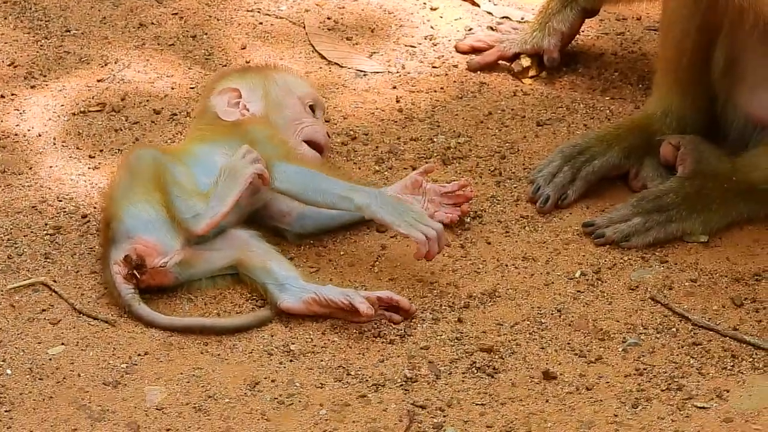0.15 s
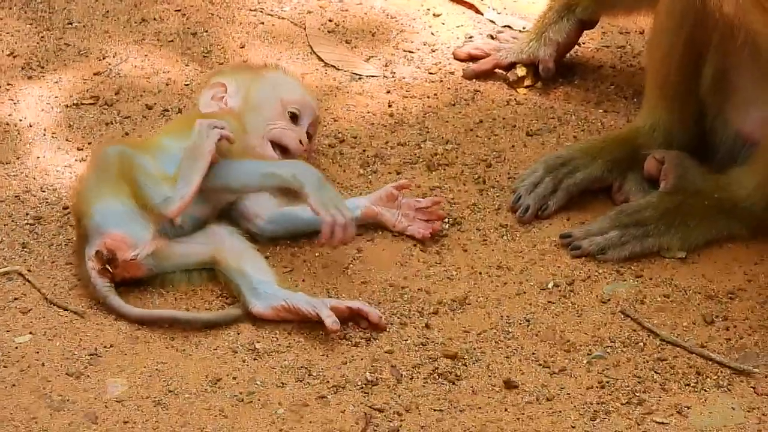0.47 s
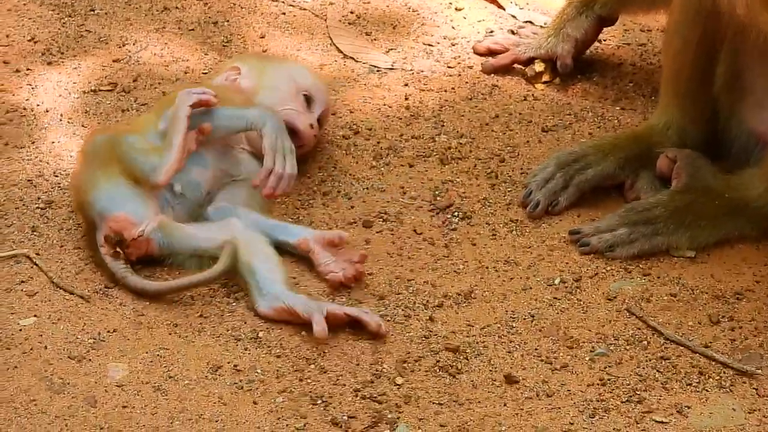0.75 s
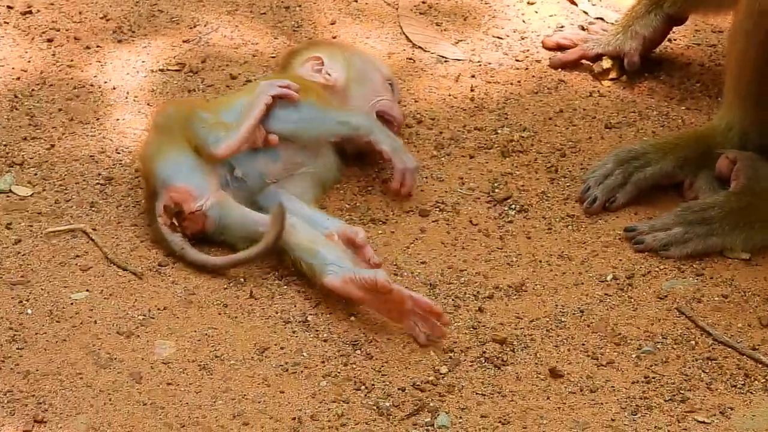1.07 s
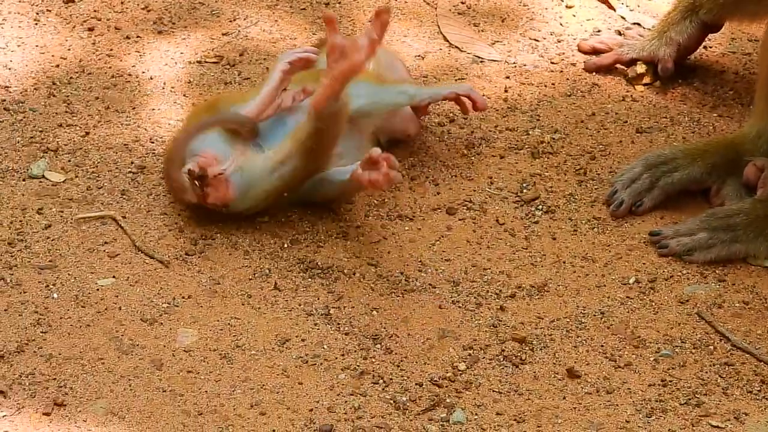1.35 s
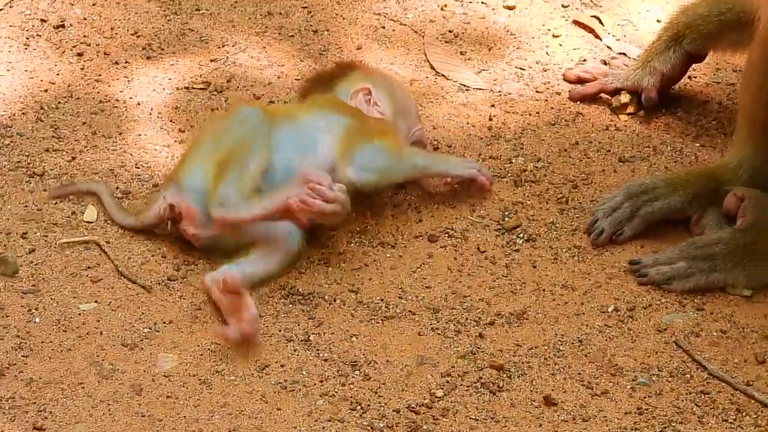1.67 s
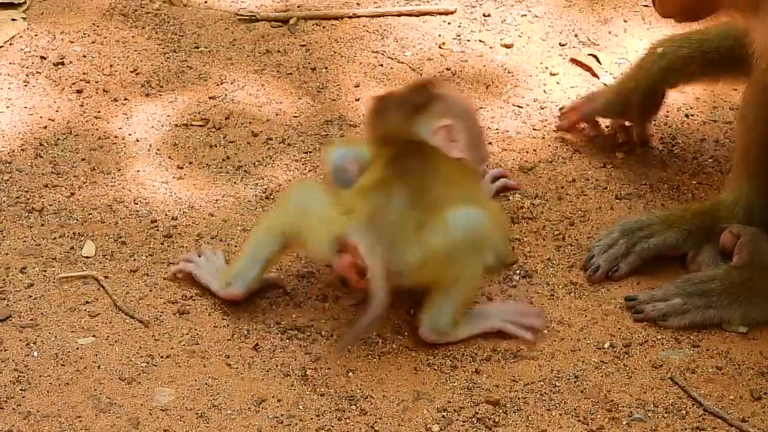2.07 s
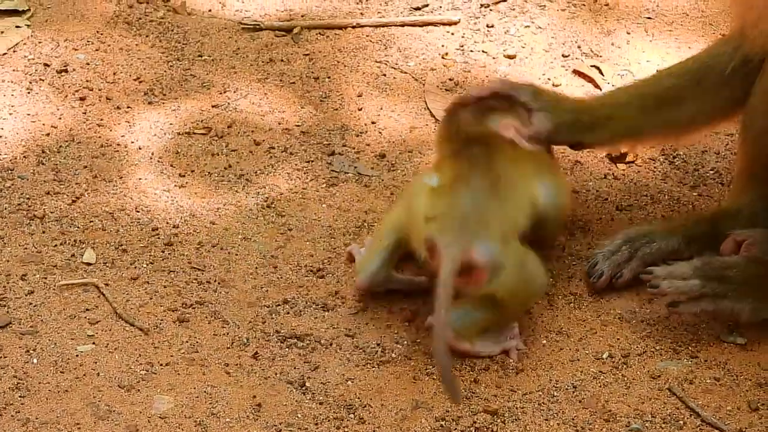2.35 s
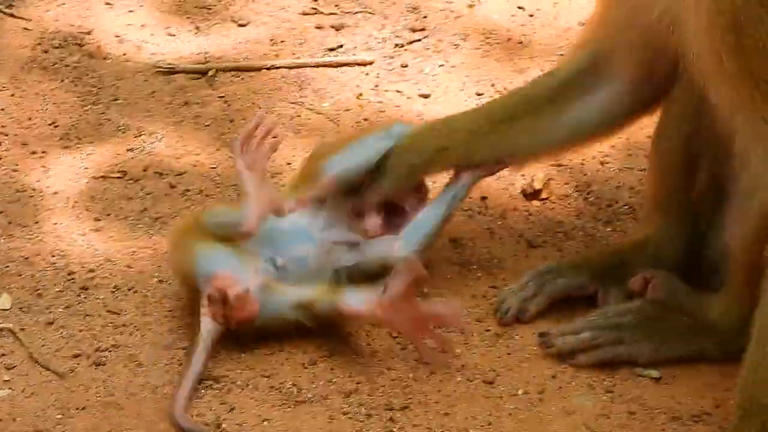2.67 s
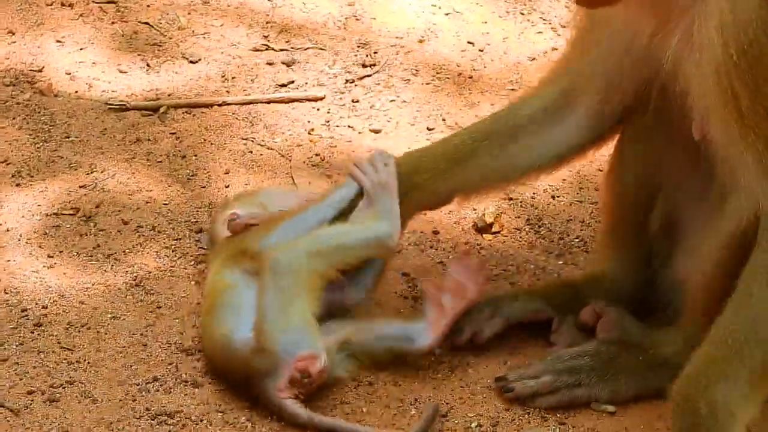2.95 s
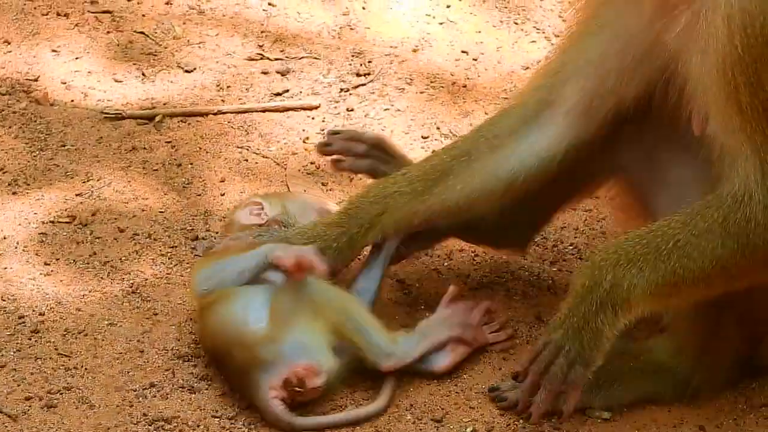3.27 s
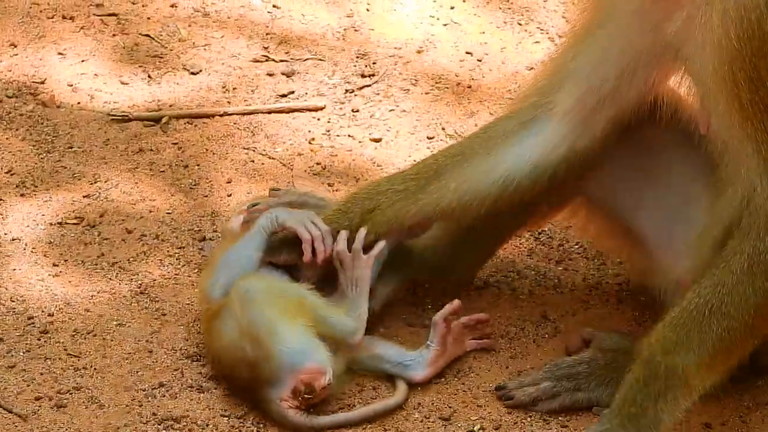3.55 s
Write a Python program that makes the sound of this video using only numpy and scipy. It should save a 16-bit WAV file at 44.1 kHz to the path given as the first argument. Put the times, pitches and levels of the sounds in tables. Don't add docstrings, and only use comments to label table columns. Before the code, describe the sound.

An infant monkey screams, with hoarse barks, rasping screeches and thin wavering whistles over forest soil

```python
import sys
import numpy as np
from scipy import signal
from scipy.fft import rfft, irfft, next_fast_len
from scipy.io import wavfile
from scipy.ndimage import uniform_filter1d, map_coordinates

SR = 44100
rng = np.random.default_rng(int(sys.argv[2]) if len(sys.argv) > 2 else 0)


def unload_audio(sound):
    columns = np.transpose(np.atleast_2d(sound))
    steps = np.round(np.clip(columns, -1, 1) * 32767)
    wavfile.write(sys.argv[1], SR, steps.astype(np.int16))


def to_linear_factor(level_db):
    exponent = np.asarray(level_db, float) / 20
    return 10 ** exponent


N = 163170

# centre in Hz, width in Hz, level in dB.
CHEST_MODES = [(572, 336, -2), (1320, 790, 3.2), (1743, 690, -0.5)]
FOLD_JITTER = 0.035
EDGE_S = 0.0021
BRIGHT_HZ, TOP_HZ = 5500, 12400


def unit(x):
    return x / np.sqrt(np.mean(x ** 2) + 1e-20)


def along(points, hz):
    f, v = np.transpose(points)
    return np.interp(np.log(hz + 1), np.log(f + 1), v)


def wobble(rate, size=N):
    knots = rng.standard_normal(int(size * rate / SR) + 4)
    return map_coordinates(knots, [np.arange(size) * rate / SR])


def filtered(x, response):
    m = next_fast_len(x.shape[-1] + 4096)
    spectrum = rfft(x, m) * response(np.fft.rfftfreq(m, 1 / SR))
    return irfft(spectrum, m)[..., :x.shape[-1]]


def call(rows):
    s, *cols = np.transpose(rows)
    start = round(s[0] * SR)
    t = np.arange(start, round(s[-1] * SR)) / SR
    gate = np.clip(np.minimum(t - s[0], s[-1] - t) / EDGE_S, 0, 1)
    return start, gate, [np.interp(t, s, c) for c in cols]


def folds(hz, noise_share, size):
    arch_depth, shimmer_db = 0.27, 1.5
    along_call = np.linspace(-1, 1, size)
    arch = 1 - arch_depth * along_call ** 2
    jitter = FOLD_JITTER * (wobble(25, size) + wobble(500, size))
    cycles = np.cumsum(hz * (arch + jitter)) / SR
    swing = np.cos(2 * np.pi * cycles)
    shut = np.exp(40 * (swing - 1))
    pulses = unit(np.diff(shut, prepend=0) * to_linear_factor(shimmer_db * wobble(608.5, size)))
    puff_gain = (1.3 + swing) * to_linear_factor(2.5 * np.tanh(wobble(250, size)))
    puffs = unit(rng.standard_normal(size) * puff_gain)
    share = noise_share + .25 - .5 * np.exp(-6 * along_call ** 2) + .15 * wobble(30, size)
    share = np.clip(share, .2, 1)
    return cycles, np.sqrt(1 - share) * pulses + np.sqrt(share) * puffs, 1 - share


def resonant(x, modes, tilt_db=0):
    def response(f):
        one = 0
        for k, (centre_hz, width_hz, db) in enumerate(modes):
            loss = 1j * f * width_hz
            one = one + (-1) ** k * to_linear_factor(db / 2) * loss / (centre_hz ** 2 - f ** 2 + loss)
        tilt = to_linear_factor(tilt_db * np.tanh(2 * np.log((f + 1) / BRIGHT_HZ)))
        return one ** 2 / (1 + (f / TOP_HZ) ** 4) * tilt
    return unit(filtered(x, response))


def around(source, hz, width_hz):
    slow = filtered(source, lambda f: 1 / (1 + (f / width_hz) ** 4))
    return unit(slow * np.sin(2 * np.pi * np.cumsum(hz) / SR))


def blotchy(x):
    z = signal.stft(x, nperseg=256)[2]
    field = uniform_filter1d(uniform_filter1d(rng.standard_normal(z.shape), 4, 0), 5, 1)
    patch_db = 3 * unit(field)
    return unit(signal.istft(z * to_linear_factor(patch_db), nperseg=256)[1][:len(x)])


def rasp(source, db, bright_db):
    # centre in Hz, width in Hz, level in dB.
    throat = [(2460, 2230, -5.5), (4730, 540, 3.6), (5665, 1080, 3.5), (7000, 2350, 7), (9780, 5200, -4.5)]
    shrill_growth = 0.09
    voice = blotchy(resonant(source, throat, bright_db))
    upper = filtered(voice, lambda f: 1 / (1 + (BRIGHT_HZ / (f + 1)) ** 6))
    return voice + upper * (to_linear_factor(shrill_growth * (db - db.max())) - 1)


def screeches():
    # time in s, whistle in Hz, level in dB, whistle over rasp in dB.
    paths = [
        [(.924, 3530, -26, 14), (.93, 3926, -21.5, 1.5), (.965, 4005, -18, -1), (1.005, 4344, -25, -2),
         (1.015, 4305, -22.5, -18), (1.06, 4214, -25, 4.5), (1.075, 4950, -26, 11), (1.095, 4420, -35, 20)],
        [(1.22, 2880, -17.5, -2), (1.228, 3700, -26, 6), (1.26, 4076, -20, 5.5), (1.292, 4805, -13.5, 17.5),
         (1.305, 4706, -20, 2.5), (1.34, 4020, -27, -10), (1.378, 4650, -33.5, -1)],
        [(1.546, 3770, -22, 12), (1.556, 3674, -26.5, 0), (1.562, 4130, -19, 2), (1.62, 4790, -19.5, -0.5),
         (1.64, 4300, -20, -14), (1.705, 4850, -27, -8), (1.745, 4860, -20.5, -1.5), (1.78, 5580, -33.5, -5)],
        [(2.205, 4630, -27.5, 3), (2.235, 4890, -22, 4.5), (2.285, 4710, -22, 11), (2.32, 3670, -42, -17)],
        [(2.436, 2900, -29, 13.5), (2.468, 3467, -24.5, -0.5), (2.49, 4240, -25, -4), (2.533, 5080, -21.5, 3.5),
         (2.545, 4480, -16.5, -3), (2.59, 4110, -22.5, -0.5), (2.612, 5480, -16.5, 7.5),
         (2.65, 5030, -17.5, 12), (2.685, 4610, -39, 0)],
    ]
    # fold rate in Hz, noise share 0-1, torn band in dB, chest in dB,
    # brightness in dB.
    voices = [(820, 0.56, -8, -24, 7.5), (757, 0.86, 1.5, -23, 2), (956, 0.21, 5, -33, 3),
              (825, 0.5, 3.5, -29.5, 9), (829, 0.63, -0.5, -21.5, 6.5)]
    scatter_hz, flutter_db, onset_s = 185, 3, .006
    out = np.zeros(N)
    for rows, (fold_hz, noise_share, torn_db, chest_db, bright_db) in zip(paths, voices):
        at, gate, (hz, db, tone_db) = call(rows)
        size = len(gate)
        cycles, source, order = folds(fold_hz, noise_share, size)
        flap = np.sin(2 * np.pi * cycles)
        late = np.clip(np.arange(size) / SR / onset_s - 1, 0, 1)
        phase = 2 * np.pi * np.cumsum(hz + scatter_hz * wobble(700, size)) / SR
        tone = unit(np.sin(phase + 0.46 * late * flap) * to_linear_factor(flutter_db * wobble(163.2, size)))
        torn_band = to_linear_factor(torn_db) * blotchy(around(source, hz + 600, 800))
        torn = unit(torn_band + rasp(source, db, bright_db))
        chest = resonant(source, CHEST_MODES) + 1.74 * order ** 2 * flap
        voice = to_linear_factor(tone_db) * tone + late * (torn + to_linear_factor(chest_db) * chest)
        out[at:at + size] += gate * to_linear_factor(db) * voice / np.sqrt(1 + to_linear_factor(2 * tone_db))
    return out


def barks():
    # time in s, level in dB, jaw resonance in Hz, chest in dB, shrill in dB.
    paths = [
        [(.277, -34, 2520, 7, -27), (.287, -19.5, 2599, -12, -28), (.296, -20, 2607, -2.5, -1.5),
         (.309, -26.5, 2375, -2.5, 9), (.318, -28, 1123, 5.5, -25), (.343, -35, 1136, 3, -8),
         (.36, -43, 1110, -4, -8)],
        [(.479, -22, 2463, -5, -20), (.488, -17.5, 2659, -17, -20), (.497, -23, 1510, -6.5, 4),
         (.518, -24.5, 1242, 3, -9), (.548, -31, 1322, -12, 0), (.565, -62, 1290, -10, 0)],
        [(.62, -35.5, 1388, -17, -20), (.664, -30.5, 1510, 0, -16), (.673, -22, 3146, -28, -18),
         (.684, -23.5, 3004, -7.5, 14), (.702, -21, 2695, -1.5, -11), (.713, -25, 2676, -6, 7),
         (.727, -24, 3210, -17, -4)],
        [(.727, -26.5, 3390, -25, -11), (.746, -19.5, 4054, -20.5, 3.5), (.77, -25, 4280, -5.5, 0),
         (.805, -41, 3510, -12, -8)],
        [(3.437, -36, 1810, -19, -27), (3.455, -34, 2300, -11, -19), (3.495, -28, 2586, -6.5, -2),
         (3.528, -25, 3373, -14.5, 7), (3.555, -32.5, 3190, -23, 5.5), (3.572, -50, 2960, -13, -5)],
    ]
    # fold rate in Hz, jaw in dB, brightness in dB, shrill resonance in Hz.
    voices = [(480.4, -2, -7, 6500), (588, -0.5, -6, 7000), (760, -3.5, -7.5, 7000), (830, -2, 4.5, 6300),
              (802, 0.5, -5.5, 6300)]
    rasp_db = 0.5
    out = np.zeros(N)
    for rows, (fold_hz, jaw_db, bright_db, shrill_hz) in zip(paths, voices):
        at, gate, (db, jaw_hz, chest_db, shrill_db) = call(rows)
        size = len(gate)
        source = folds(fold_hz, .9, size)[1]
        throat_part = to_linear_factor(rasp_db) * rasp(source, db, bright_db)
        jaw = to_linear_factor(jaw_db) * around(source, jaw_hz, 360)
        chest = to_linear_factor(chest_db) * resonant(source, CHEST_MODES)
        shrill = to_linear_factor(shrill_db) * around(source, np.full(size, shrill_hz), 1010)
        out[at:at + size] += gate * to_linear_factor(db - 4) * (throat_part + jaw + chest + shrill)
    return out


def whistles():
    # time in s, pitch in Hz, level in dB.
    paths = [
        [(1.772, 7000, -38), (1.826, 6870, -35), (1.85, 7000, -45.5), (1.87, 6900, -37), (1.879, 5760, -36),
         (1.9, 4960, -44), (1.945, 4270, -43.5), (1.97, 3670, -45), (2.012, 3630, -48)],
        [(2.014, 4480, -47), (2.03, 4800, -40.5), (2.05, 4710, -39.5), (2.09, 4920, -41.5), (2.14, 4610, -32.5),
         (2.165, 4280, -49), (2.2, 4820, -31.5)],
        [(2.682, 4730, -36), (2.7, 5060, -25), (2.742, 5610, -25), (2.755, 6350, -29), (2.772, 6230, -25.5),
         (2.785, 5480, -39), (2.812, 5420, -32), (2.856, 6500, -32.5), (2.91, 6500, -32.5)],
        [(2.905, 5960, -42), (2.92, 5930, -29), (2.948, 6120, -32.5), (2.972, 5540, -32.5),
         (3.005, 5560, -32.5), (3.06, 5170, -37.5), (3.125, 4950, -32.5), (3.19, 4950, -43.5)],
        [(3.19, 4460, -40), (3.214, 4980, -29.5), (3.232, 4400, -33), (3.243, 4420, -34), (3.25, 5255, -17.5),
         (3.26, 4980, -19.5), (3.272, 4140, -43)],
    ]
    # time in s, pitch in Hz, level in dB.
    flick = [(1.375, 6450, -28), (1.386, 6450, -32), (1.396, 6000, -41), (1.408, 5650, -24.5),
             (1.422, 5200, -29.5), (1.434, 4100, -32)]
    # octave in dB, half-pitch lines in dB.
    voices = [(-25, -60), (-15, -60), (-13, -60), (-16, -60), (-16, -60), (-25, -27)]
    # time in s, half length in s, fold rate in Hz, sideband in dB, breakup in Hz.
    catches = [(1.82, .045, 1150, -8, 90), (1.93, .04, 900, -14, 130), (2.733, .016, 820, 0, 60),
               (2.885, .03, 920, -3, 100), (3.11, .085, 700, -8, 200)]
    twelfth_db, air_db = -13, -27
    tremble_s, tremble_half_s, tremble_hz, tremble_rate_hz = 2.08, 0.061, 170, 24
    out, t = np.zeros(N), np.arange(N) / SR
    breakup_hz, flap = 60, 0
    for s, half_s, fold_hz, side_db, catch_hz in catches:
        touch = np.exp(-((t - s) / half_s) ** 4)
        fold_phase = 2 * np.pi * np.cumsum(fold_hz * (1 + FOLD_JITTER * wobble(200))) / SR
        flap = flap + touch * to_linear_factor(side_db) * np.exp(1j * fold_phase)
        breakup_hz = breakup_hz + catch_hz * touch
    tremble = np.exp(-((t - tremble_s) / tremble_half_s) ** 4)
    tremble = tremble * np.cos(2 * np.pi * tremble_rate_hz * (t - tremble_s))
    scatter_hz = breakup_hz * wobble(900) + 50 * wobble(50) + tremble_hz * tremble
    breath = filtered(rng.standard_normal(N),
                      lambda f: 1 / (1 + (9000 / (f + 1)) ** 4) / (1 + (f / 13000) ** 12))
    air = to_linear_factor(air_db) * unit(breath)
    for rows, (octave_db, half_db) in zip([flick, *paths], voices):
        at, gate, (hz, db) = call(rows)
        size = len(gate)
        here = slice(at, at + size)
        turn = np.exp(1j * np.pi * np.cumsum(hz + scatter_hz[here]) / SR)
        octave_gain = to_linear_factor(octave_db + 6.1 * wobble(53.7, size)) / (1 + (1.82 * hz / TOP_HZ) ** 6)
        overtones = octave_gain * (turn ** 4 + to_linear_factor(twelfth_db) * (hz < 5200) * turn ** 6)
        half_lines = to_linear_factor(half_db) * (0.34 * turn + turn ** 3 + 0.39 * turn ** 5)
        tone = turn ** 2 + overtones + half_lines
        sidebands = 1 + np.conj(flap[here]) + 0.41 * flap[here]
        chopped = tone * sidebands / np.sqrt(1 + abs(flap[here]) ** 2)
        level = to_linear_factor(db + 4 + 0.98 * wobble(100.6, size))
        out[here] += gate * level * (chopped.real + air[here])
    return out


def scuffs():
    # start in s, peak in dB, loudest frequency in Hz, length in s. The first two rows are small
    drags = [(.058, -29.5, 740, 0.015), (0.118, -26, 930, 0.025), (0.142, -36, 5030, 0.02),
             (0.246, -31.5, 2880, 0.035), (1.404, -38, 516, 0.022), (1.569, -31.5, 490, 0.016),
             (1.84, -32, 4070, 0.043), (2.107, -26.5, 6000, 0.0033), (2.147, -29.5, 6050, 0.015),
             (2.39, -36, 790, 0.031), (2.887, -41.5, 1510, 0.11)]
    # frequency in Hz, density in dB per Hz.
    soil = [(300, -11), (1000, 8), (3000, -5), (20000, -48)]
    out, t = np.zeros(N + SR), np.arange(SR // 4) / SR
    for s, db, hz, length_s in drags:
        grit = unit(rng.standard_normal(len(t)) * to_linear_factor(4 * wobble(400, len(t))))
        shape = np.clip(t / EDGE_S, 0, 1) * np.exp(-(t / length_s) ** 2)
        puff = unit(filtered(grit, lambda f: to_linear_factor(along(soil, f / hz * 1000))))
        out[round(s * SR):][:len(t)] += to_linear_factor(db - 8.5) * shape * puff
    return out[:N]


def trees(x):
    # frequency in Hz, t60 in s.
    decay = [(500, 0.26), (4000, 0.55), (12000, 0.37)]
    trunks_db, ground_db, ground_t60_s = -13.5, -10, .02
    hz, t, z = signal.stft(rng.standard_normal((2, SR // 2)), SR, nperseg=256)
    tail = signal.istft(z * to_linear_factor(-60 * t / along(decay, hz)[:, None]), SR, nperseg=256)[1]
    ground_fade = to_linear_factor(-60 * np.arange(tail.shape[1]) / SR / ground_t60_s)
    ground = rng.standard_normal(tail.shape) * ground_fade
    both = to_linear_factor(trunks_db) * tail / np.linalg.norm(tail[0])
    both = both + to_linear_factor(ground_db) * ground / np.linalg.norm(ground[0])
    return signal.fftconvolve(np.pad(x, (60, 0))[None], both, axes=1)[:, :N]


def rush(gain, patchy_db):
    # frequency in Hz, left-right likeness 0-1.
    alike = [(500, 0.85), (4000, 0.48), (12000, 0.077)]
    z = signal.stft(rng.standard_normal((2, N)), nperseg=512)[2]
    field = uniform_filter1d(uniform_filter1d(rng.standard_normal(z.shape[1:]), 6, 0), 8, 1)
    pair = signal.istft(z * to_linear_factor(patchy_db * unit(field)), nperseg=512)[1][:, :N]

    def mid_side(hz):
        angle = np.arccos(np.clip(along(alike, hz), -1, 1)) / 2
        return gain(hz) * np.array([np.cos(angle), np.sin(angle)])
    mid, side = filtered(pair, mid_side)
    return unit(np.array([mid + side, mid - side]))


def forest():
    # time in s, background level in dB.
    levels = [(0, -43), (.6, -43), (.8, -60), (1.5, -53.5), (2.099, -59.5), (3.7, -51)]
    # frequency in Hz, density in dB per Hz.
    hiss_spectrum = [(40, -21), (200, -4.5), (2800, -12), (4700, -2), (13000, -22), (15500, -63)]
    rustle_spectrum = [(60, -14.5), (250, -5), (5000, -16.5), (13000, -32)]
    hiss_db, rustle_db, insect_db = 9, -6.5, -8
    rustle_growth = 1.51
    insect_hz, insect_width_hz = 7600, 300
    db = np.interp(np.arange(N) / SR, *np.transpose(levels))
    low = db.min()
    hiss = to_linear_factor(low + hiss_db) * rush(lambda f: to_linear_factor(along(hiss_spectrum, f)), patchy_db=4.0)
    rustle = rush(lambda f: to_linear_factor(along(rustle_spectrum, f)), patchy_db=3.0)
    rustle = to_linear_factor(low + rustle_db + rustle_growth * (db - low)) * rustle
    insect = rush(lambda f: np.exp(-((f - insect_hz) / insect_width_hz) ** 2), patchy_db=8.5)
    insect = to_linear_factor(db + insect_db + wobble(29.0)) * insect
    return hiss + rustle + insect


def scene():
    right_late_s, pan_db = 2e-5, -0.75
    near = screeches() + barks() + whistles() + scuffs()
    side = np.array([[1], [-1]])
    ports = filtered(near, lambda f: np.exp(1j * np.pi * f * right_late_s * side))
    return ports * to_linear_factor(pan_db * side) + trees(near) + forest()


def roll_off(x):
    return signal.sosfilt(signal.butter(12, 15720, fs=SR, output="sos"), x)


def record(dry):
    low_cut_hz = 110
    mix = filtered(dry, lambda f: 1 / (1 + (low_cut_hz / (f + 1)) ** 2))
    return roll_off(mix)


dry = scene()
out = record(dry)
unload_audio(out)
```